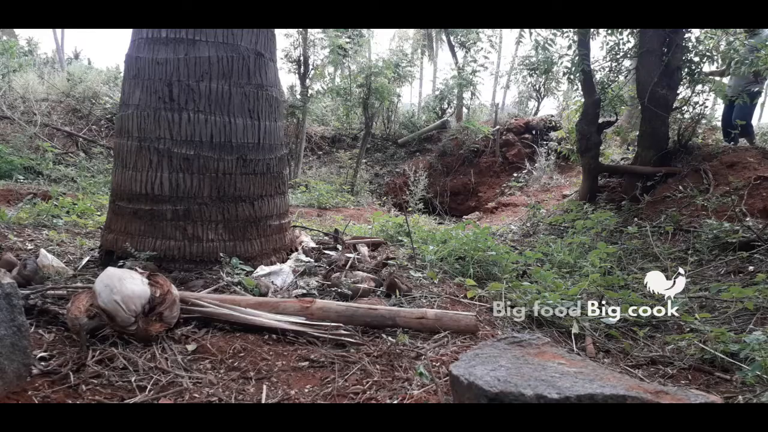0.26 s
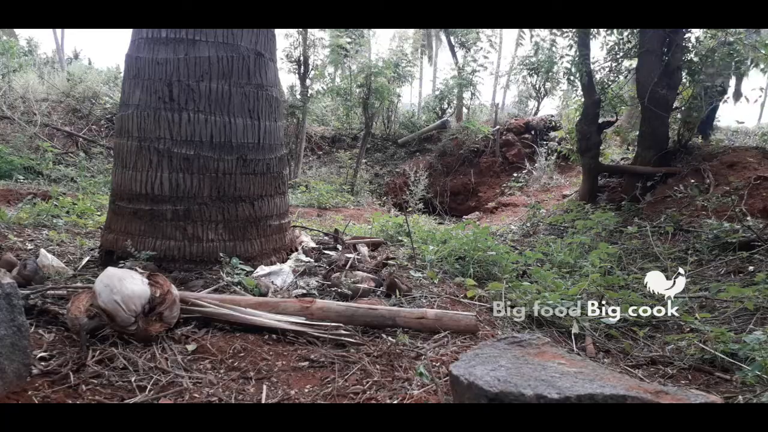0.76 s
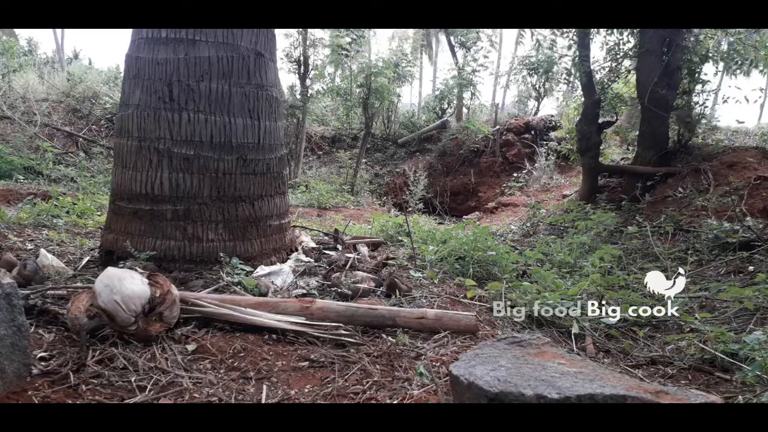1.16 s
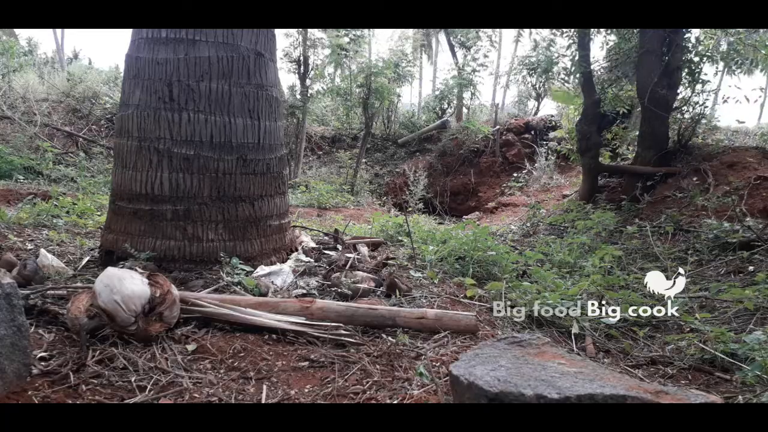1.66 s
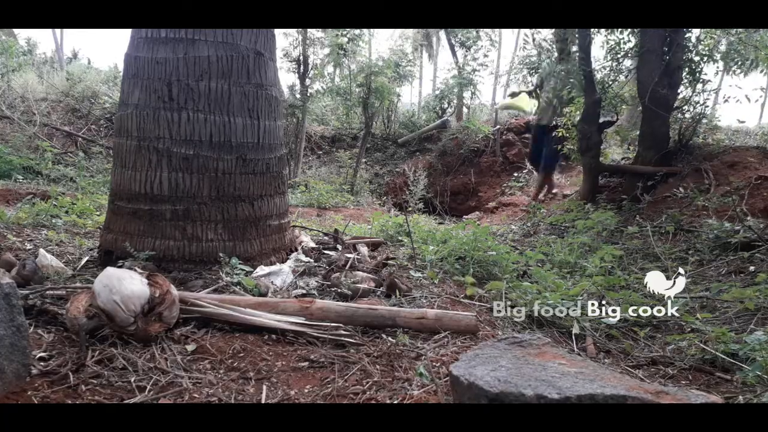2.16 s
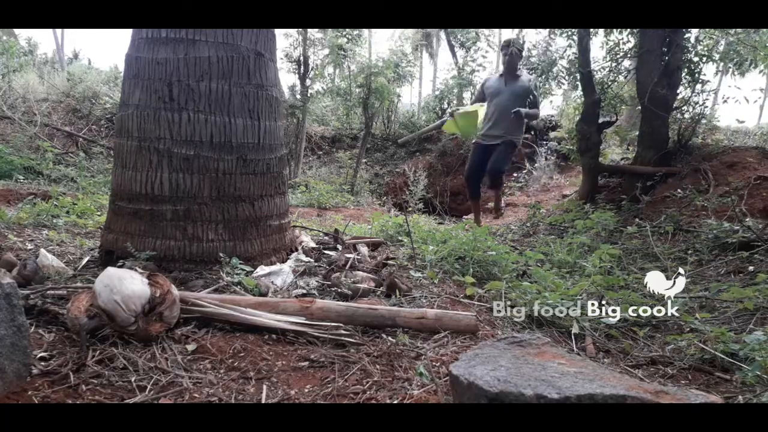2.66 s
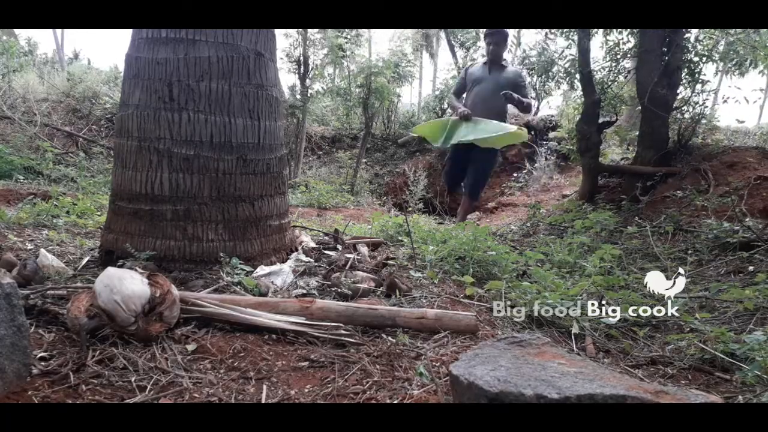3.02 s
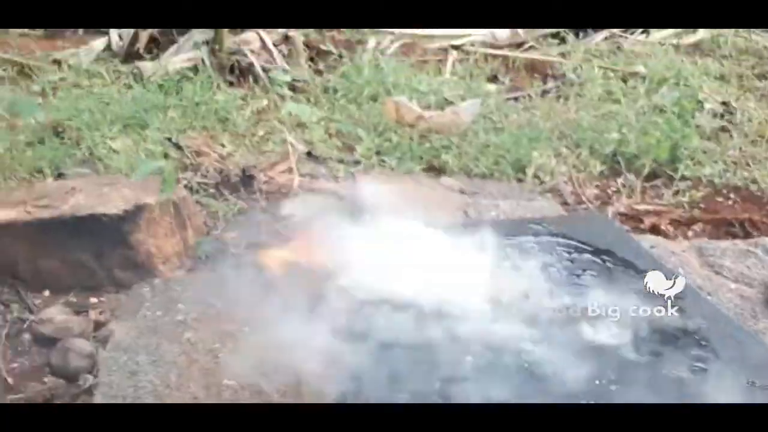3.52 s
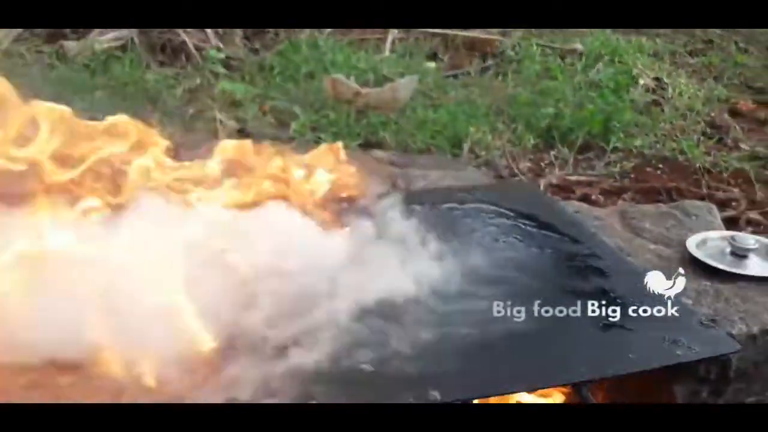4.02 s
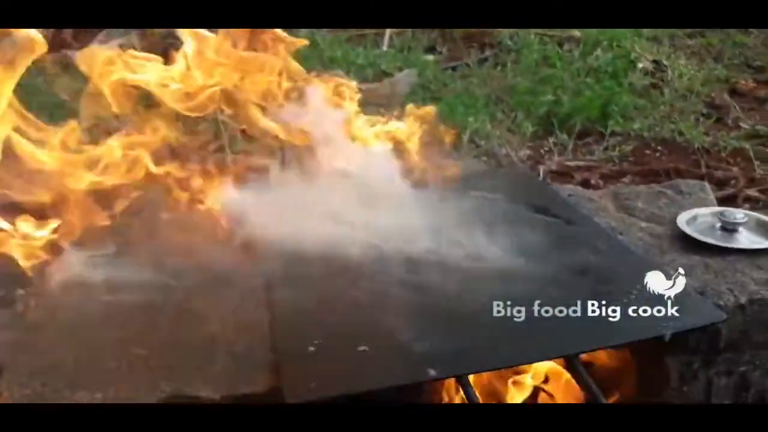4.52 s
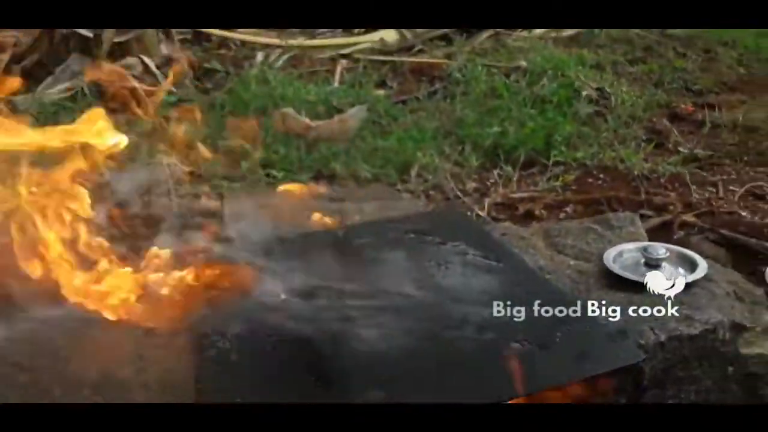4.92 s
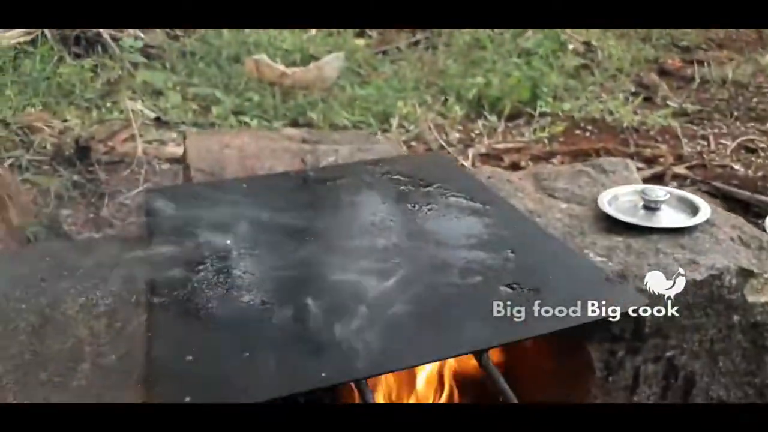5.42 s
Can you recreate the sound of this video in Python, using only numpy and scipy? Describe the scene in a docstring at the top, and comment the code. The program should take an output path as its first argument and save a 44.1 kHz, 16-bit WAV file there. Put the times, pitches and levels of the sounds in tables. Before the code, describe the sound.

A quiet grove with thin bird chirps and two twig snaps is suddenly broken by a roaring steam hiss, knocking boil and dying crackle.

```python
"""A palm grove with a wood fire: small birds whistle among the trees as filtered noise rustles and rumbles.
Soft puffs of air bump the microphone as brief low swings, and dry twigs snap underfoot as sharp pulses.
Then water slaps onto a hot iron griddle: coloured noise and random clicks make the hiss of steam and the boil,
low noise makes the flames roar and flare, steam pockets knock, and drops spit as the plate dries."""
import sys
import numpy as np
from scipy import signal
from scipy.fft import rfft, irfft, next_fast_len
from scipy.io import wavfile

SR = 44100
rng = np.random.default_rng(int(sys.argv[2]) if len(sys.argv) > 2 else 0)


def log_audio(samples):
    """Write samples as a 16-bit WAV file to the path given in sys.argv[1]."""
    # one column per channel
    frames = np.atleast_2d(samples).T
    # limit to full scale, then quantise
    limited = np.clip(frames, -1, 1)
    pcm = np.round(limited * 32767).astype(np.int16)
    wavfile.write(sys.argv[1], SR, pcm)


N = 250488
TIME = np.arange(N) / SR

# Colour of the rustling leaves. Each row: frequency in Hz, relative level in dB.
LEAF_SPECTRUM = [(200, -15), (320, -7.5), (420, -11.5), (900, -5.5), (2000, -5.5), (3200, -1), (4600, -0.5),
                 (6500, -4.5), (9000, -7), (10200, -14), (12500, -17.5), (14000, -37), (15800, -32)]
# Colour of the breeze on the microphone. Each row: frequency in Hz, relative level in dB.
BREEZE_SPECTRUM = [(25, -26), (55, 1.5), (95, 1), (150, -6.5), (240, -12.5), (400, -29)]
# Puffs of air on the microphone. Each row: centre in seconds, peak in dB, half length in seconds.
AIR_PUFFS = [(.301, -42.5, 0.0038), (.752, -32, .011), (.797, -47, 0.016), (.949, -41.5, .01),
             (.975, -31.5, 0.011), (1.615, -44, .013), (1.703, -48.5, 0.026), (2.514, -41, 0.019),
             (2.668, -45.5, 0.011), (2.97, -43.5, .012), (3.019, -39, 0.015)]
# Peeps that rise and level off. Each row: start in seconds, length in seconds, pitch approached in Hz,
# level in dB before swell and flutter, roughness from 0 to 1.
PEEPS = [(0.552, 0.085, 2880, -48.5, 0.75), (0.692, 0.078, 3560, -51.5, 0.34), (1.08, 0.077, 3925, -49, 0),
         (1.169, 0.046, 2943, -40.5, 0.14), (1.338, 0.13, 3800, -45, 0.25), (1.632, .135, 3915, -45.5, 0.3),
         (1.9, 0.095, 3140, -60, .15), (1.961, .125, 3685, -45.5, .15), (2.298, 0.142, 3813, -47, 0.13)]
# High, arched whistles. Each row: start in seconds, length in seconds, top pitch in Hz,
# level in dB before swell and flutter.
WHISTLES = [(0.438, 0.077, 4780, -37), (0.485, .028, 5320, -40), (0.947, 0.071, 4764, -35.5),
            (1.472, .08, 4736, -37.5), (1.994, 0.089, 4710, -37.5)]
# Quick slurs, nearly all downwards. Each row: start in seconds, length in seconds, first pitch in Hz,
# last pitch in Hz, level in dB before swell and flutter.
SLURS = [(0.518, 0.026, 4730, 3370, -43.5), (0.521, .03, 3460, 1810, -57), (.631, 0.042, 2650, 1587, -52.5),
         (0.731, .04, 3260, 1860, -55.5), (0.959, .036, 2560, 3800, -48), (.963, 0.049, 2680, 1750, -54),
         (0.996, 0.018, 4440, 3350, -43.5), (1.024, 0.028, 4480, 3580, -35), (1.126, .026, 3900, 3170, -55),
         (1.207, 0.0072, 3070, 3010, -43), (1.229, 0.019, 2680, 2430, -49), (1.243, 0.04, 2080, 1364, -59)]
# Strength of a note's overtones by where they fall. Each row: frequency in Hz, level against the note in dB.
OVERTONES = [(3000, -20), (5700, -24), (7000, -6.5), (7800, -24.5), (8700, -15), (9600, -22.5),
             (11000, -26.5), (14500, -44)]
# Dry twigs underfoot. Each row: start in seconds, peak in dB.
TWIG_SNAPS = [(2.288, -30), (2.612, -40)]
# The thrown water slaps down. Each row: centre in seconds, peak in dB, half length in seconds.
WATER_SLAPS = [(3.404, -28, 0.0017), (3.412, -22.5, .002), (3.428, -16.5, 0.0018), (3.443, -26, .012),
               (3.462, -26, .003), (3.486, -28, 0.016)]
# Rush of steam off the plate. Each row: time in seconds, level in dB before STEAM_GAIN_DB.
STEAM_FLOW = [(3.44, -22), (3.46, -23), (3.52, -18), (3.53, -26), (3.55, -18), (3.67, -17), (3.69, -21),
              (3.76, -18), (3.92, -21), (4.05, -18), (4.13, -18.5), (4.51, -16), (4.97, -27.5),
              (5.17, -44.5), (5.2, -43), (5.45, -52.5), (5.59, -43.5), (5.68, -53.5)]
# Colour of the steam before the hearth and the treble tilt. Each row: frequency in Hz, relative level in dB.
STEAM_SPECTRUM = [(710, -19.5), (1200, -30.5), (1430, -16.5), (1750, -6), (2170, -5.5), (2940, -3),
                  (3680, 1), (4060, 1), (8830, 0.5), (10300, -3), (12900, -3.5), (15100, -6.5),
                  (15800, -12.5)]
# Resonances of the plate and its stone hearth. Each row: centre in Hz, width in Hz,
# level against the direct sound in dB.
HEARTH_RESONANCES = [(1890, 250, -17.5), (3560, 240, -14), (5300, 1200, -21.5), (9000, 670, -14)]
# Vigour of the boil, which also fans the flames. Each row: time in seconds, level in dB before drying and gains.
BOIL_VIGOUR = [(3.55, -38.5), (3.62, -28.5), (4.34, -35.5), (4.62, -32.5), (4.63, -36.5), (4.88, -43.5),
               (5.02, -42.5), (5.34, -65), (5.62, -66)]
# Colour of the boil. Each row: frequency in Hz, relative level in dB.
BOIL_SPECTRUM = [(200, -3), (400, -7), (560, 2), (800, -0.5), (1100, -1), (1700, 2.5), (2400, -5),
                 (4000, -29.5)]
# Colour of the flames. Each row: frequency in Hz, relative level in dB.
FLAME_SPECTRUM = [(25, -44), (60, -3.5), (110, 4), (200, 2), (350, -5), (600, -24.5)]
# Steam pockets popping under the water. Each row: start in seconds, peak of the knock in dB.
STEAM_POPS = [(3.522, -25), (3.538, -16.5), (3.985, -22.5), (4.142, -19.5), (4.183, -17), (4.294, -14.5),
              (4.48, -20), (4.489, -18), (4.578, -22.5), (4.602, -13), (5.209, -51)]
# The loudest bursting drops. Each row: start in seconds, peak in dB.
LOUD_SPITS = [(3.591, -10), (3.834, -11), (3.951, -8), (4.82, -18), (4.88, -21), (5.098, -16), (5.132, -16),
              (5.188, -20), (5.209, -14), (5.216, -18), (5.251, -19), (5.255, -25), (5.357, -24),
              (5.374, -23.5), (5.467, -28.5), (5.575, -29), (5.617, -21), (5.652, -21.5)]

GROVE_START_S, SPLASH_S, WET_S = 0.296, 3.432, 0.034  # the griddle swells in over WET_S
LEAVES_DB, BREEZE_DB = -55.5, -64.0  # before their drifts and the drop at the splash
# A puff has its pitch in Hz at the half length PUFF_S; shorter ones are higher by the power PUFF_SHRINK.
PUFF_HZ, SLAP_HZ, POP_PUFF_HZ = 124, 147, 110
PUFF_S, PUFF_SHRINK = 0.00948, 0.305
PEEP_RISE, PEEP_SETTLE = 0.065, 2.7  # share of the pitch climbed; how early it levels off
WHISTLE_ARCH, WHISTLE_FLICK = 0.021, 0.037  # share by which both ends sag; share dropped in a last flick
WHISTLE_ROUGH = 0.12  # 0 to 1
SLUR_EASE, SLUR_ROUGH_PER_OCTAVE = 1.8, 1.2  # bend of the slide; wider sweeps are rougher
FLUTTER_DB, FLUTTER_HZ = 4, 74  # depth (spread) at full roughness; corner of the drift
STEAM_GAIN_DB, BOIL_GAIN_DB, FLAME_GAIN_DB = 1.5, 0, -10
# Above full flow the top of the hiss lags by TREBLE_LOSS dB per dB.
TREBLE_DB, TREBLE_LOSS, FULL_FLOW_DB = 2.5, 0.37, -21
# Vapour bursts thin out as the film dries; BURST_DB is their level against smooth steam.
WET_BURSTS_PER_S, DRY_BURSTS_PER_S, FILM_DRIES_S, BURST_DB = 5500, 900, 4.6, 4.5
DRYING_S, DRY_OUT_S, DRY_OUT_DB = 5.05, 0.12, 6.5  # start, length and depth of the boil's fade
FLARE_S, FLARE_LENGTH_S, FLARE_DB = 3.665, 0.027, 4  # the flames leap up once
POP_PUFF_DB, POP_PUFF_S = -11, 0.0047  # puff against its knock; its half length
# Small spits on the drying plate: largest peak above the steam curve, and the range below that.
STRAY_SPITS_PER_S, STRAY_SPIT_DB, STRAY_SPREAD_DB = 36, 11, 2
CUTOFF_HZ = 15900


def from_db(db):
    """Turn decibels into gain."""
    return 10 ** (np.asarray(db) / 20)


def rms_one(x):
    """Scale to rms 1."""
    return x / np.sqrt(np.mean(x ** 2) + 1e-20)


def curve(rows):
    """Draw a curve of times and levels through every sample."""
    seconds, levels = np.transpose(rows)
    return np.interp(TIME, seconds, levels)


def ramp(start, length):
    """Rise from 0 to 1."""
    return np.clip((TIME - start) / length, 0, 1)


def drift(corner_hz):
    """Slow random wander with rms 1: noise through two equal low-pass poles, at a twentieth of the rate."""
    pole = np.exp(-40 * np.pi * corner_hz / SR)
    noise = rng.standard_normal(N // 20 + 4002)
    slow = signal.lfilter([1], [1, -2 * pole, pole * pole], noise)[4000:]  # skip the filter's run-in
    return np.interp(np.arange(N) / 20, np.arange(len(slow)), rms_one(slow))


def band(x, low_hz, high_hz):
    """Causal band-pass."""
    sos = signal.butter(2, [low_hz, min(high_hz, 0.45 * SR)], "band", fs=SR, output="sos")
    return signal.sosfilt(sos, x + 1e-18)


def colour(x, spectrum):
    """Give a steady sound a spectrum, drawn over log frequency; rms 1."""
    hz, db = np.transpose(spectrum)
    size = next_fast_len(N)
    bins = np.maximum(np.fft.rfftfreq(size, 1 / SR), 1)
    gain = from_db(np.interp(np.log(bins), np.log(hz), db))
    gain = gain * np.minimum(bins / hz[0], 1) ** 2  # roll off below the first point
    return rms_one(irfft(rfft(x, size) * gain, size)[:N])


def bursts(per_s, spread_db):
    """Random clicks of uneven size, balanced in power as their rate changes; rms 1."""
    sizes = from_db(spread_db * np.minimum(rng.exponential(1, N), 4)) * rng.choice([-1, 1], N)
    fires = rng.random(N) < per_s / SR
    return rms_one(fires * sizes / np.sqrt(per_s))


def cracks(rows, tail_db, tail_s, low_hz, high_hz):
    """Each crack is one sharp pressure pulse with a short, decaying noise spatter, band-passed."""
    out, t = np.zeros(N), TIME[:SR // 12]
    for s, db in rows:
        spatter = from_db(tail_db) * rng.standard_normal(len(t)) * np.exp(-t / tail_s)
        crack = band((t == 0) + spatter, low_hz, high_hz)
        crack = from_db(db) * crack / np.abs(crack).max()
        at = int(s * SR)
        out[at:at + len(t)] += crack[:N - at]
    return out


def grove():
    """Leaves rustle faintly over a lumpy rumble of breeze, both noise with drifting levels."""
    leaves = from_db(LEAVES_DB + 1.03 * drift(8.7)) * colour(rng.standard_normal(N), LEAF_SPECTRUM)
    gust_db = 3.5 * drift(9)
    breeze = from_db(BREEZE_DB + gust_db) * colour(rng.standard_normal(N), BREEZE_SPECTRUM)
    return leaves + breeze


def puffs(rows, pitch_hz):
    """A puff is a swell of a few slow, uneven pressure swings; short ones are higher."""
    out, wobble = np.zeros(N), np.tanh(drift(120))
    for s, db, half_s in rows:
        span = slice(int((s - 4 * half_s) * SR), int((s + 4 * half_s) * SR))
        hz = pitch_hz * (PUFF_S / half_s) ** PUFF_SHRINK
        uneven_hz = hz * np.exp(0.47 * wobble[span])
        phase = 2 * np.pi * (rng.random() + np.cumsum(uneven_hz) / SR)
        envelope = np.exp(-((TIME[span] - s) / half_s) ** 2)
        out[span] += from_db(db) * envelope * np.sin(phase)
    return out


def whistle(s, length, pitch, db, rough, swell=0.22, grow_db=4):
    """One note with two overtones on a pitch contour over 0-1; it grows louder and trembles if rough."""
    out, span = np.zeros(N), slice(int(s * SR), int((s + length) * SR))
    u = np.linspace(0, 1, span.stop - span.start)
    hz = pitch(u) * (1 + 0.067 * rough * drift(390)[span])
    phase = 2 * np.pi * np.cumsum(hz) / SR
    tone = np.sin(phase)
    for k in (2, 3):
        overtone_db = np.interp(k * hz, *np.transpose(OVERTONES))
        tone += from_db(overtone_db) * np.sin(k * phase)
    flutter_db = FLUTTER_DB * rough * drift(FLUTTER_HZ)[span]
    level = from_db(db + grow_db * (u - 1) + flutter_db)
    envelope = np.abs(np.sin(np.pi * u)) ** swell
    out[span] = level * np.sqrt(2) * envelope * tone
    return out


def trees(x, t60, wet_db):
    """Trunks and leaves scatter many faint echoes, which fade by 60 dB in t60 seconds."""
    t = TIME[:SR]
    sparse = rng.standard_normal(SR) * (rng.random(SR) < 0.03)
    echoes = sparse * from_db(-60 * t / t60) * (t > 0.008)
    echoes = echoes / np.sqrt(np.sum(echoes ** 2))
    return x + from_db(wet_db) * signal.fftconvolve(x, echoes)[:N]


def birds():
    """Three kinds of note among the trees, each set by its pitch contour: peeps, whistles and slurs."""
    song = np.zeros(N)
    for s, length, hz, db, rough in PEEPS:
        rise = lambda u: hz * (1 - PEEP_RISE * np.exp(-PEEP_SETTLE * u))
        song += whistle(s, length, rise, db, rough, swell=0.2, grow_db=3.5)
    for s, length, hz, db in WHISTLES:
        arch = lambda u: hz * (1 - WHISTLE_ARCH * (2 * u - 1) ** 2 - WHISTLE_FLICK * u ** 8)
        song += whistle(s, length, arch, db, WHISTLE_ROUGH, swell=0.32, grow_db=15)
    for s, length, start, end, db in SLURS:
        slide = lambda u: end + (start - end) * (1 - u) ** SLUR_EASE
        rough = SLUR_ROUGH_PER_OCTAVE * abs(np.log2(start / end))
        song += whistle(s, length, slide, db, rough)
    return trees(song, t60=0.52, wet_db=-3.0)


def twigs():
    """Dry twigs snap underfoot: a pulse with a strong, short spatter."""
    return cracks(TWIG_SNAPS, tail_db=1, tail_s=0.0041, low_hz=2380, high_hz=9800)


def slaps():
    """Thrown water slaps down, pushing out short low swings of pressure."""
    return puffs(WATER_SLAPS, SLAP_HZ)


def hearth(x):
    """Plate and stone ring broadly: two-pole resonances added to the direct sound."""
    out = x
    for hz, width, db in HEARTH_RESONANCES:
        r = np.exp(-np.pi * width / SR)
        feed = np.array([1, 0, -1]) * (1 - r * r) / 2
        back = [1, -2 * r * np.cos(2 * np.pi * hz / SR), r * r]
        out = out + from_db(db) * signal.lfilter(feed, back, x)
    return out


def sputter(x, patchy_db, rate):
    """Jets of different sizes come and go, so each half octave flickers on its own; rms 1."""
    size = next_fast_len(N)
    whole = rfft(x, size)
    bins = np.maximum(np.fft.rfftfreq(size, 1 / SR), 1)
    place = np.clip(2 * np.log2(bins / 1000), 0, 8)  # half octaves above 1 kHz
    out = np.zeros(N)
    for k in range(9):
        share = np.maximum(1 - np.abs(place - k), 0)
        out += irfft(whole * share, size)[:N] * from_db(patchy_db * drift(rate))
    return rms_one(out)


def boil_level():
    """Vigour of the boil in dB, fading as the plate dries."""
    return curve(BOIL_VIGOUR) - DRY_OUT_DB * ramp(DRYING_S, DRY_OUT_S)


def sizzle():
    """Tiny vapour bursts crackle inside the rush of steam; larger bubbles boil lower down."""
    flow_db = curve(STEAM_FLOW)
    per_s = WET_BURSTS_PER_S * (DRY_BURSTS_PER_S / WET_BURSTS_PER_S) ** ramp(FILM_DRIES_S, 0.8)
    share = from_db(BURST_DB)
    spray = (rng.standard_normal(N) + share * bursts(per_s, spread_db=3.0)) / np.sqrt(1 + share ** 2)
    steam = sputter(hearth(colour(spray, STEAM_SPECTRUM)), patchy_db=1.0, rate=22)

    top = signal.sosfiltfilt(signal.butter(2, 9500, "high", fs=SR, output="sos"), steam)
    treble_db = TREBLE_DB - TREBLE_LOSS * np.maximum(flow_db - FULL_FLOW_DB, 0)
    steam = steam + top * (from_db(treble_db) - 1)

    bubbles = rng.standard_normal(N) + 0.63 * bursts(per_s / 4, spread_db=5.0)
    boil_db = boil_level() + BOIL_GAIN_DB + 0.4 * drift(11)
    boil = from_db(boil_db) * colour(bubbles, BOIL_SPECTRUM)
    surge_db = 0.68 * drift(45)  # water meets hot iron in quick surges
    return from_db(surge_db) * (from_db(flow_db + STEAM_GAIN_DB) * steam + boil)


def fire():
    """Flames flutter as a low noise roar, fanned by the boil, and flare up soon after the splash."""
    flare_db = FLARE_DB * np.exp(-((TIME - FLARE_S) / FLARE_LENGTH_S) ** 2)
    level_db = boil_level() + FLAME_GAIN_DB + flare_db + 0.45 * drift(11)
    return from_db(level_db) * colour(rng.standard_normal(N), FLAME_SPECTRUM)


def pops():
    """A steam pocket opens with a dull knock and pushes out a puff of air."""
    knocks = cracks(STEAM_POPS, tail_db=-24.5, tail_s=0.0023, low_hz=129, high_hz=1060)
    pushed = [(s, db + POP_PUFF_DB, POP_PUFF_S) for s, db in STEAM_POPS]
    return knocks + puffs(pushed, POP_PUFF_HZ)


def spits():
    """Drops burst sharply; on the drying plate small ones spit at random, fading with the steam."""
    born = (rng.random(N) < STRAY_SPITS_PER_S / SR) & (TIME > DRYING_S)
    stray_db = curve(STEAM_FLOW) + STRAY_SPIT_DB - STRAY_SPREAD_DB * rng.random(N)
    drops = list(LOUD_SPITS) + list(zip(TIME[born], stray_db[born]))
    return cracks(drops, tail_db=-20.5, tail_s=0.0019, low_hz=2370, high_hz=14500)


def scene():
    """The grove first, then the griddle; leaves and breeze drop 5 dB just before the splash."""
    air = grove() * ramp(GROVE_START_S, 0.0011) * from_db(-5 * ramp(3.39, 0.018))
    air = air + puffs(AIR_PUFFS, PUFF_HZ)
    life = birds() + twigs()
    griddle = slaps() + (sizzle() + fire()) * ramp(SPLASH_S, WET_S) + pops() + spits()
    return (air + life + griddle)[None]


def record(dry):
    """Round the highest peaks by soft saturation and cut the top with a steep low-pass."""
    rounded = np.tanh(dry)
    low_pass = signal.ellip(12, 0.1, 85, CUTOFF_HZ, fs=SR, output="sos")
    return signal.sosfilt(low_pass, rounded)


dry = scene()
out = record(dry)
log_audio(out)
```